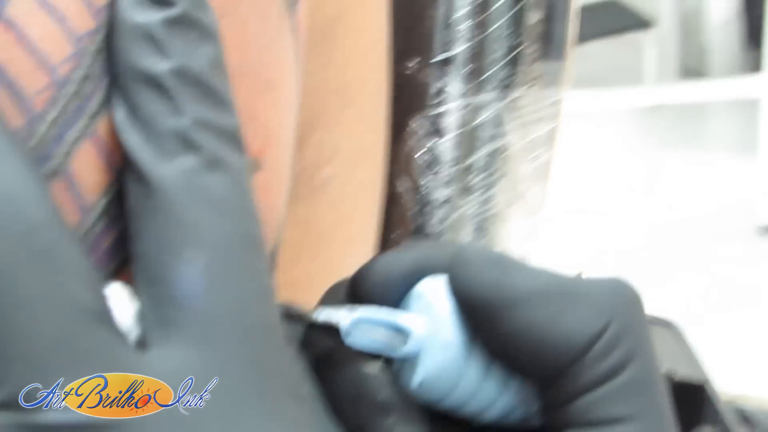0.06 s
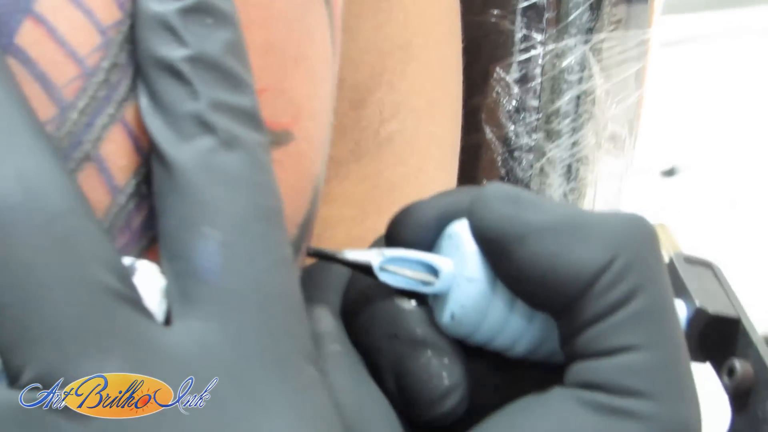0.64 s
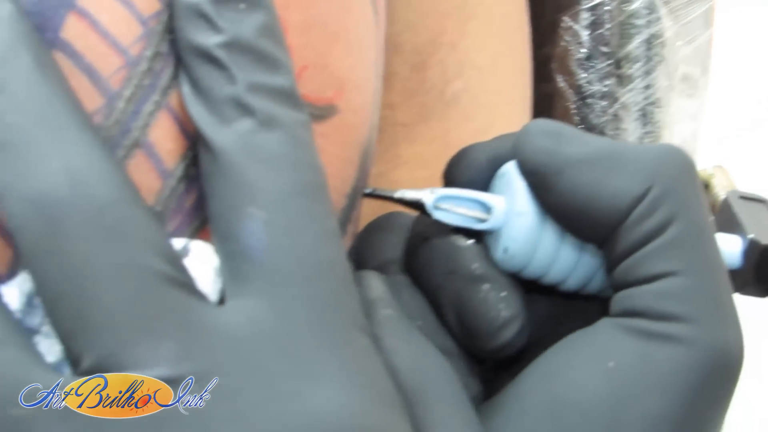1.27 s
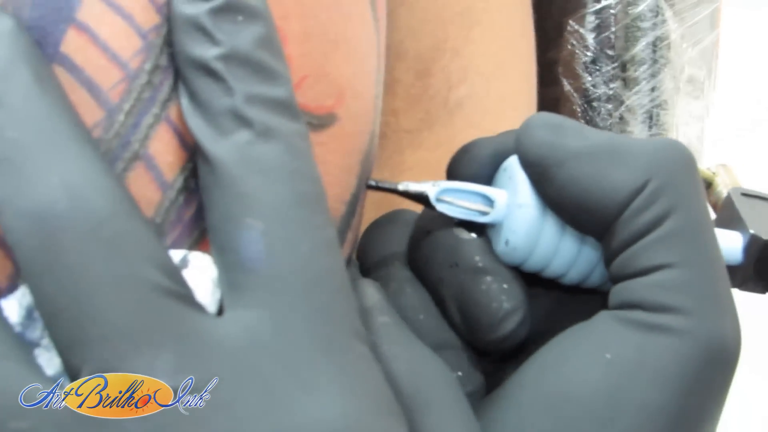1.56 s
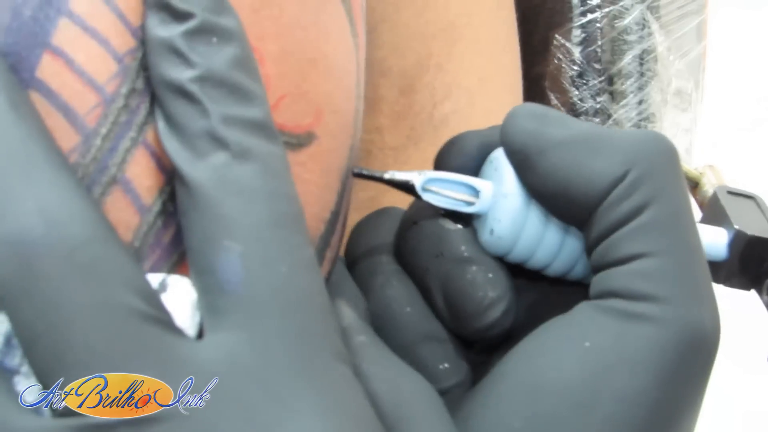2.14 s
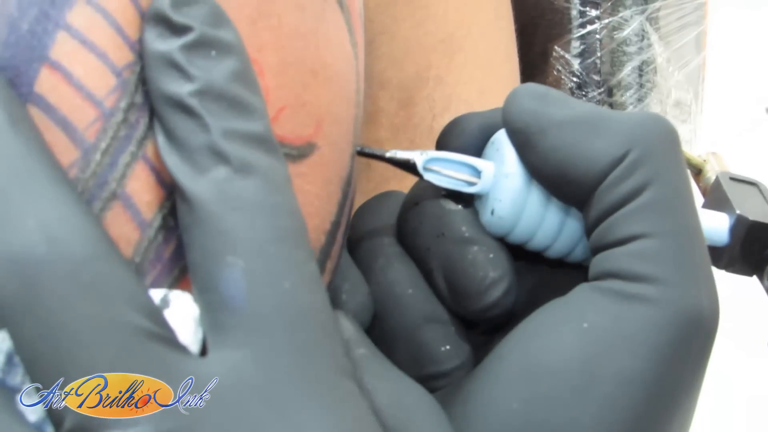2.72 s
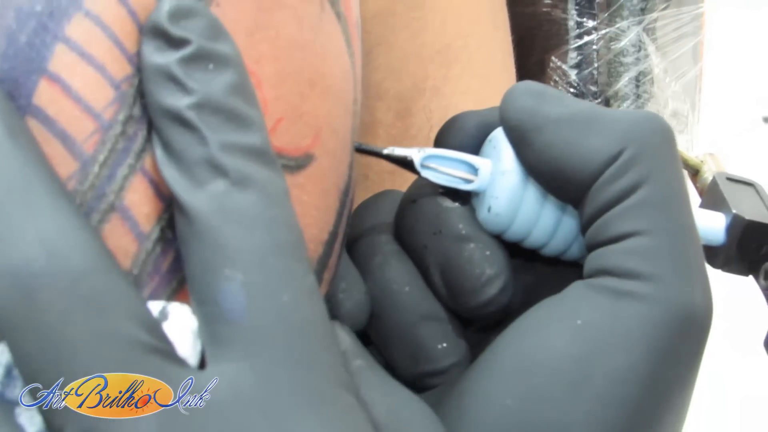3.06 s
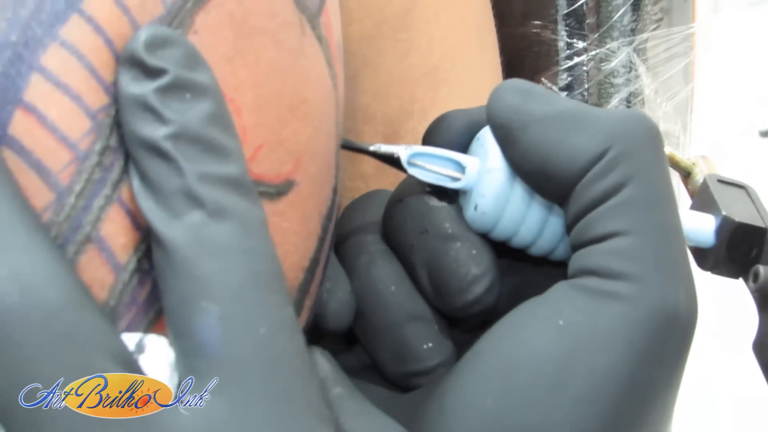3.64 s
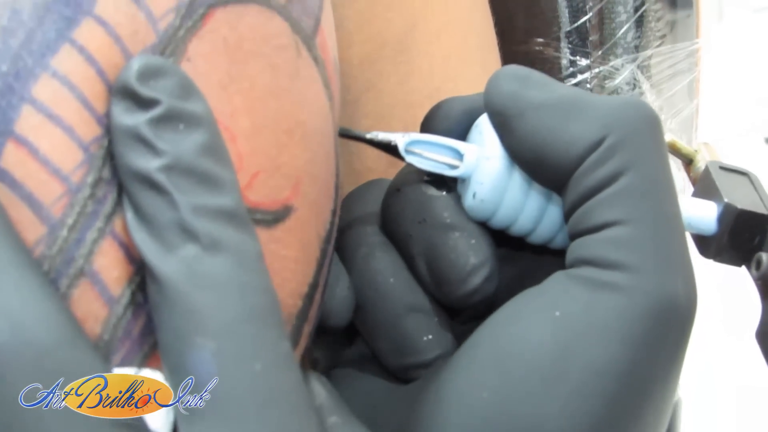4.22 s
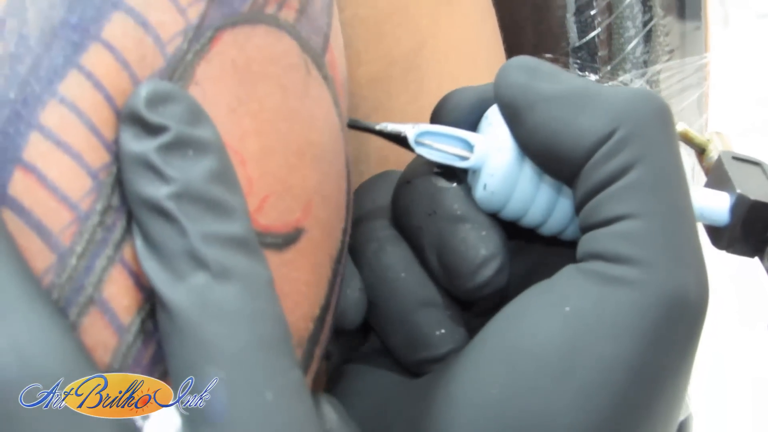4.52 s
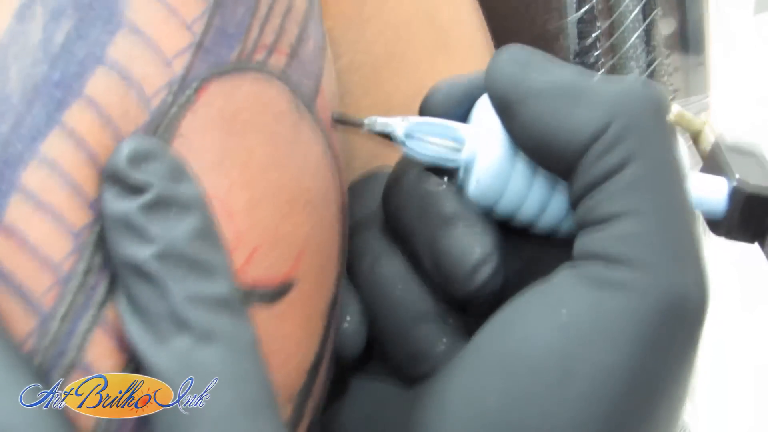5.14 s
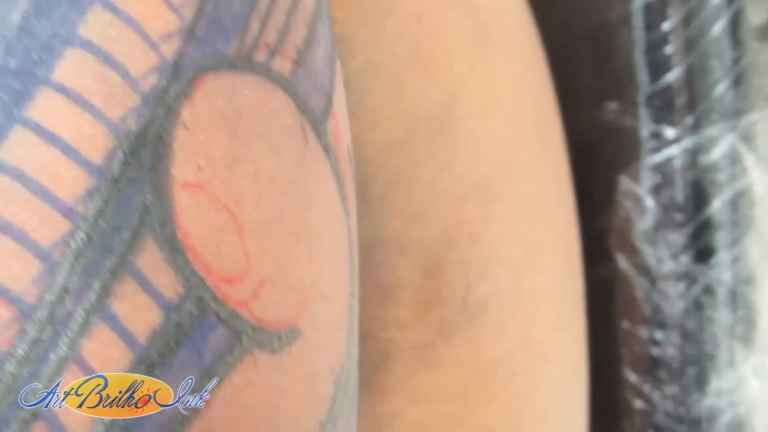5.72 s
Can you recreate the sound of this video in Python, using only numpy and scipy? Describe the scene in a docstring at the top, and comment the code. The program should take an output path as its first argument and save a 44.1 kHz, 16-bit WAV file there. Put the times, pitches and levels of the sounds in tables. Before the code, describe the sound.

An electric tattoo machine buzzes right by the microphone in a small, hard-walled studio. The buzz is wiry and nearly constant in pitch, with a high metallic sizzle and ring, and now and then it tightens for an instant. After about five seconds it switches off abruptly. Soft ventilation hums underneath throughout, and a faint, dry handling tick comes just before the end.

```python
"""A coil tattoo machine buzzes close to a stereo microphone in a small, hard-walled studio.
Its armature slams onto the coils about 119 times a second and springs back against the contact screw;
each blow rattles the needle bar and rings the steel. Now and then the bar seats into a clean cycle and
the buzz tightens. Ventilation hums underneath. The machine is switched off, and a faint handling tick
follows."""
import sys
import numpy as np
from scipy import signal
from scipy.fft import rfft, irfft, next_fast_len
from scipy.io import wavfile
from scipy.ndimage import uniform_filter1d, map_coordinates

SR = 44100
rng = np.random.default_rng(int(sys.argv[2]) if len(sys.argv) > 2 else 0)


def dump(signal):
    """Clip the signal to [-1, 1] and save it as 16-bit WAV at the path in sys.argv[1]."""
    limited = np.clip(np.atleast_2d(signal).T, -1, 1)
    pcm = np.round(limited * 32767).astype(np.int16)
    wavfile.write(sys.argv[1], SR, pcm)


N = 259308
TIME = np.arange(N) / SR
OFF_S = 5.315
RETURN_PHASE = .43  # share of a cycle from the blow on the coils to the return on the screw
LEAD_SAMPLES = 128  # padding ahead of a blow's response

# Armature stroke rate, drifting with the load: time_s, rate_hz
STROKE_RATE = [(0, 118.6), (.2, 118.4), (.47, 118.7), (.6, 118.15), (.8, 118.6), (1.62, 118.5),
               (1.72, 117.6), (1.81, 118.85), (2, 118.9), (2.12, 118.5), (2.33, 118.7), (2.5, 118.1),
               (2.6, 118.9), (2.76, 118.3), (3, 118.65), (3.7, 118.65), (3.95, 119.1), (4.25, 118.6),
               (4.55, 119.2), (5, 119.35), (5.1, 118.9), (5.3, 119.5)]
# Relative levels as the hand moves along the skin: time_s, rattle_db, tube_db, sizzle_db, ring_db
WORK_LEVELS = [(0, -36, -43.5, -32, -34), (0.7, -35, -43.5, -32, -37), (1.4, -36, -43.5, -32, -33.5),
               (2.1, -36.5, -45, -34, -30), (2.65, -36.5, -44.5, -33, -29), (3.15, -38, -48.5, -35, -27.8),
               (3.7, -38.5, -47, -35.5, -29), (4.25, -40, -47, -37, -29.5), (4.7, -39, -46, -36, -26),
               (5.17, -38.5, -44.5, -35, -28.5), (5.3, -39, -46, -36.5, -36)]
# Return on the contact screw, dipping early and then growing: time_s, level_db
RETURN_LEVEL = [(0, -7.5), (1.3, -18), (2.3, -13), (3, -10.5), (4.3, -7.5), (5.3, 2.5)]
# The bar seats; the shift moves energy from frame and contacts to the bar's sizzle:
# middle_s, length_s, tightening_db, shift_db, speedup_hz, whistle_db, rasp_db
BAR_SEATS = [(0.119, 0.12, -3, 1.1, 0.86, 4, 2), (0.334, 0.079, 1, 0.7, 0.71, 8, 1.5),
             (0.666, 0.087, 6, 0, 0.61, 4, -1.5), (0.93, 0.062, 4, 0, 0.93, 3, -1),
             (1.198, 0.083, 5, 0.3, 0.59, 8, 0.5), (1.414, 0.12, 18.5, 0.4, 0.97, 7, 0.5),
             (2.397, 0.08, 17, 1.3, 1.55, 11, 2), (2.855, 0.059, 6.5, 0.8, 1.06, 8, 2.5),
             (3.127, 0.11, 7, 0.5, 0.021, 3, -1), (3.408, 0.11, 14, 0.3, 0.2, -1, 0),
             (3.857, 0.066, 18, 0, 0.33, 8, -3.5), (4.073, 0.1355, 11.5, 2, 1.2, 7, 1.5),
             (4.408, 0.091, 2, 1.5, 0.69, 4, 0), (4.6, 0.051, 7, 1, 0.08, -1, 0),
             (4.705, 0.048, 7.5, 1, 1, 10, 1.5), (4.83, 0.046, 10, 0.3, 0, 5, 0),
             (4.916, 0.076, 7, 1, 1.04, 3, 0.5)]
# Colour of the blows in frame and tube: frequency_hz, gain_db
TUBE_COLOUR = [(300, -16), (600, -13), (1150, -6.5), (1700, -8), (2100, 3.5), (2500, -2.5), (3400, 4),
               (4000, 5.5), (4800, -9.5), (6000, -24.5)]
# Colour of the contacts' clatter: frequency_hz, gain_db
CLATTER_COLOUR = [(3000, -50), (4200, -10), (5200, -2.5), (6500, 0), (7500, 0), (8100, 1.5), (9500, -25.5)]
# Colour of the needle bar's sizzle: frequency_hz, gain_db
SIZZLE_COLOUR = [(7000, -27.5), (8000, -3.5), (8700, 0.5), (9700, 3), (10400, 1.5), (11000, 5), (11500, 3),
                 (12400, 0.5), (13300, -2.5), (14300, -7), (15500, -26.5)]
# Ring of the armature, drifting with the load: time_s, pitch_hz
RING_PITCH = [(0, 10950), (1, 10950), (1.9, 11280), (3.3, 11490), (4.2, 11260), (4.8, 11130), (5.3, 11240)]
# Width of that ring, greater when it is damped more: time_s, width_hz
RING_WIDTH = [(0, 800), (2, 760), (3.5, 740), (4.2, 820), (4.7, 1050), (5.3, 950)]
# Whistle of the needle bar, drifting with the grip: time_s, pitch_hz
WHISTLE_PITCH = [(0, 10070), (.8, 9700), (1.3, 9670), (2.4, 9820), (3.3, 9900), (4.1, 9870), (4.7, 10250),
                 (5.3, 10270)]
# Wiry partials of frame and tube: stroke_rate_multiple, level_db
FLEX_PARTIALS = [(5, -4), (8, -30), (9, -1), (10, 2), (11, -1), (12, -14), (13, -4.5), (14, -9.5),
                 (15, -11), (16, -7.5), (17, 2), (18, -27), (19, 4), (20, -10), (21, -9.5), (22, -4),
                 (23, -5.5), (24, -18), (25, -9.5), (26, -7.5), (27, -8), (28, -8.5), (29, -5), (30, -15),
                 (31, -14), (32, -1)]
# Narrow rising bands where single buzz partials briefly dip or swell, including a 3.8 kHz ring:
# time_s, centre_hz, rise_hz_per_s, width_hz, gain_db
PARTIAL_SWELLS = [(3.202, 1110, 190, 67, 0), (3.302, 3810, 116, 65, 10), (4.6, 1900, 110, 140, -4),
                  (5, 3320, 100, 348, 0.5), (2.3, 1067, 60, 45, -3), (1, 2016, 110, 80, -2.5)]
# Decay of the studio: frequency_hz, t60_s
STUDIO_DECAY = [(200, 0.98), (2000, 0.46), (6000, 0.47), (10000, 0.38), (15000, 0.25)]
# Stereo width of the blows at the microphone: frequency_hz, side_gain_db
STEREO_WIDTH = [(300, -2.5), (2500, -13.5), (4500, -12.5), (6000, -4.5), (9000, -3.5), (13000, -2)]
# Colour of the ventilation's rush: frequency_hz, gain_db
AIR_COLOUR = [(18, -32), (30, -17), (55, -20), (90, -5), (125, -11), (190, -3), (280, -8), (360, -5),
              (450, -12), (750, -10), (1400, -11.5), (3900, -25), (11500, -35), (15000, -44)]
# Left-right likeness of that rush: frequency_hz, correlation
AIR_LIKENESS = [(100, 0.9), (300, 0.85), (1500, 0.5), (8000, 0.36)]
# Strength of the draught: time_s, level_db
AIR_LEVEL = [(0, -46.1), (1.3, -45), (2.1, -47.4), (2.7, -47.1), (4.1, -49.9), (5.4, -48.9), (5.88, -47.3)]
# Swelling hum of the fan motor: time_s, level_db
MOTOR_LEVEL = [(0, -58.5), (.6, -61), (1.2, -55.5), (1.55, -55), (1.8, -63), (2.7, -60.5), (4.5, -65.5),
               (5.3, -65)]
# Other ventilation tones: pitch_hz, level_db
FAN_TONES = [(31, -66.5), (43.2, -64), (147, -62.5), (172.3, -66), (360.5, -59.5), (690, -65)]
# Handling tick: peak_s, level_db
HANDLING_TICKS = [(5.677, -38)]
# Narrow gaps in the microphone's response: centre_hz, width_hz, remaining_gain
MIC_NOTCHES = [(3950, 226, 0.16), (7940, 180, 0.18)]


def amp(db):
    """Decibels to gain."""
    return 10 ** (np.asarray(db) / 20)


def unit(x):
    """Scaled to rms 1."""
    return x / np.sqrt(np.mean(x ** 2) + 1e-20)


def along(points, hz):
    """(Hz, value) points interpolated on a log axis."""
    frequencies, values = np.transpose(points)
    return np.interp(np.log(hz + 1), np.log(frequencies + 1), values)


def curves(rows):
    """One value per sample for each column after the time."""
    times, *columns = np.transpose(rows)
    return [np.interp(TIME, times, column) for column in columns]


def wobble(rate):
    """A smooth random curve, rate knots a second."""
    return map_coordinates(rng.standard_normal(int(N * rate / SR) + 4), [TIME * rate])


def filtered(x, response):
    """x through a complex response of frequency."""
    size = 2 * next_fast_len(N // 2 + SR // 4)
    return irfft(rfft(x, size) * response(np.fft.rfftfreq(size, 1 / SR)), size)[..., :N]


def minimum_phase(points, hz):
    """Causal response with the gain of (Hz, dB) points."""
    cepstrum = irfft(np.log(amp(along(points, hz))))
    half = len(cepstrum) // 2
    return np.exp(rfft(np.r_[cepstrum[0], 2 * cepstrum[1:half], np.zeros(half)]))


def pulses(times, sizes):
    """Impulses placed between samples by a windowed sinc."""
    at = times[:, None] * SR
    index = np.floor(at).astype(int) + np.arange(-7, 9)
    shape = np.sinc(index - at) * np.cos(np.pi * (index - at) / 16) ** 2
    return np.bincount(np.clip(index, 0, N).ravel(), (sizes[:, None] * shape).ravel(), N + 1)[:N]


def seating(rate_hz):
    """The loose needle bar seats quickly, holds a clean cycle for a moment and lets go."""
    holds = np.array([np.exp(-(2 * (TIME - middle) / length) ** 4) for middle, length, *_ in BAR_SEATS])
    tight_db, shift_db, speedup_hz, whistle_db, rasp_db = np.transpose(BAR_SEATS)[2:] @ holds
    loose = amp(-3.2 + 1.8 * wobble(20) - tight_db)
    # a load that slows the armature shifts energy back to frame and contacts
    load_db = .6 * (rate_hz - uniform_filter1d(rate_hz, size=SR))
    grip_db = .12 * wobble(14)
    return loose, shift_db + load_db + grip_db, speedup_hz, whistle_db, rasp_db


def armature_strokes(turns, loose, jitter_s=1e-5, scatter_db=3):
    """A firm blow on the coils, a more erratic return on the screw; looseness scatters both."""
    cycle = np.arange(int(np.interp(OFF_S, TIME, turns)))
    chance = rng.standard_normal((1000, 4))[:len(cycle)] * np.interp(cycle, turns, loose)[:, None]
    blow_s = np.interp(cycle, turns, TIME) + jitter_s * chance[:, 0]
    return_s = np.interp(cycle + RETURN_PHASE, turns, TIME) + 2 * jitter_s * chance[:, 1]
    blows = pulses(blow_s, amp(.5 * scatter_db * chance[:, 2]))
    returns = pulses(return_s, amp(scatter_db * chance[:, 3]))
    return unit(blows), unit(returns)


def rattle(turns, loose, running, tube_db, clatter_db, sizzle_db):
    """Strokes shake tube, contacts and needle bar; the bar chatters most just after each contact."""
    blows, returns = armature_strokes(turns, loose)
    after = lambda phase: np.exp(-((turns - phase) % 1) / .18)
    chatter = unit(rng.standard_normal(N) * running * (after(0) + 1.2 * after(RETURN_PHASE)))

    def part(colour, return_db, chatter_db):
        """Blow, return and chatter blended at even power, then coloured by one part."""
        back = amp(curves(RETURN_LEVEL)[0] + return_db)
        shake = loose * amp(chatter_db)
        drive = (blows + back * returns + shake * chatter) / np.sqrt(1 + back ** 2 + shake ** 2)
        return unit(filtered(drive, lambda hz: minimum_phase(colour, hz)))

    return (amp(tube_db) * part(TUBE_COLOUR, return_db=3, chatter_db=7.5)
            + amp(clatter_db) * part(CLATTER_COLOUR, return_db=-1, chatter_db=3.5)
            + amp(sizzle_db) * part(SIZZLE_COLOUR, return_db=11, chatter_db=-4))


def struck_mode(turns, stroke_hz, pitch_hz, width_hz, scatter_db, slip_rad, detune_hz=35):
    """A mode struck once a cycle swells and dies away, slightly different with each blow."""
    size, detune, lag = rng.standard_normal((1000, 3))[np.floor(turns).astype(int)].T
    age_s = turns % 1 / stroke_hz
    decay = np.pi * width_hz * age_s
    phase = 2 * np.pi * (pitch_hz + detune_hz * detune) * age_s + slip_rad * lag
    return unit(amp(scatter_db * size) * decay * np.exp(-decay) * np.sin(phase))


def steel_ring(turns, stroke_hz, loose):
    """The armature rings on the blow and weakly on the return."""
    pitch_hz, width_hz = curves(RING_PITCH)[0], curves(RING_WIDTH)[0]
    blow, back = (struck_mode(at, stroke_hz, pitch_hz, width_hz, scatter_db=1.2, slip_rad=1.1 * loose)
                  for at in (turns, turns - RETURN_PHASE))
    return unit(blow + amp(curves(RETURN_LEVEL)[0] - 14) * back)


def bar_whistle(turns, stroke_hz, loose):
    """The needle bar whistles equally on blow and return."""
    pitch_hz = curves(WHISTLE_PITCH)[0]
    return unit(sum(struck_mode(at, stroke_hz, pitch_hz, width_hz=220, scatter_db=2, slip_rad=1.2 * loose)
                    for at in (turns, turns - RETURN_PHASE)))


def rebounds(body, t60_s=.0061, scatter_db=.5):
    """Dense little rebounds follow each blow and leave its broad colour even; mid and side."""
    t = np.arange(SR // 50) / SR
    tail = rng.standard_normal((2, len(t))) * amp(-60 * t / t60_s)
    tail /= np.linalg.norm(tail, axis=1, keepdims=True)
    tail[0] = amp(scatter_db) * tail[0] + (t == 0)  # the blow itself, in the mid only
    spectrum = rfft(np.pad(tail, ((0, 0), (LEAD_SAMPLES, 0))))
    tail = irfft(spectrum / np.sqrt(uniform_filter1d(abs(spectrum) ** 2, size=12, axis=1)))
    tail /= np.linalg.norm(tail, axis=1, keepdims=True)
    return signal.fftconvolve(body[None], tail, axes=1)[:, LEAD_SAMPLES:LEAD_SAMPLES + N]


def wall_response():
    """The walls' answer as mid and side; each frequency dies at its own speed."""
    hz, t, spectrum = signal.stft(rng.standard_normal((2, SR // 2)), SR, nperseg=256)
    decay = amp(-60 * t / along(STUDIO_DECAY, hz)[:, None])
    tail = signal.istft(spectrum * decay, SR, nperseg=256)[1]
    return tail / np.linalg.norm(tail, axis=1, keepdims=True)


def studio_reverb(x, positions=13):
    """The path to the microphone glides between wall responses as the hand moves."""
    lead = SR // 4  # the room is already sounding at the start
    x = np.r_[x[:lead], x]
    place = np.r_[np.zeros(lead), np.linspace(0, positions - 1, N)]
    room = np.zeros((2, lead + N + SR))
    for k in range(positions):
        near = np.flatnonzero(abs(place - k) < 1)
        faded = x[near] * np.cos(np.pi / 2 * (place[near] - k))
        echo = signal.fftconvolve(faded[None], wall_response(), axes=1)
        room[:, near[0]:near[0] + echo.shape[1]] += echo
    return room[:, lead:lead + N]


def swell_db(hz):
    """A buzz partial briefly dips or swells as a narrow rising band passes over it."""
    return sum(db * np.exp(-np.square((hz - centre - rise * (TIME - at_s)) / width))
               for at_s, centre, rise, width, db in PARTIAL_SWELLS if abs(hz - centre) < 1000)


def wiry_buzz(turns, frame_db, tube_db):
    """Frame (low partials) and tube (high) flex with the blows, swaying and lagging with the grip."""
    buzz = np.zeros(N)
    for k, db in FLEX_PARTIALS:
        tube_share = np.clip((k - 19) / 3, 0, 1)
        level_db = db + frame_db + tube_share * (tube_db - frame_db)
        sway_db = wobble(3.34) + 1.5 * wobble(21.96)
        lag = .4 * wobble(1.95) + .12 * np.sqrt(k) * wobble(25)
        gain = amp(level_db + sway_db + swell_db(k * STROKE_RATE[0][1]))
        buzz += gain * np.cos(2 * np.pi * k * turns + lag)
    return buzz


def tattoo_machine():
    """Close up and near centre, the armature drives rattle, ring and buzz; the studio answers."""
    running = np.clip((OFF_S - TIME) / .0037, 0, 1)
    rate_hz = curves(STROKE_RATE)[0]
    loose, shift_db, speedup_hz, whistle_db, rasp_db = seating(rate_hz)
    stroke_hz = rate_hz + speedup_hz + .08 * wobble(15)
    turns = np.cumsum(stroke_hz + .22 * loose * wobble(24)) / SR

    rattle_db, tube_db, sizzle_db, ring_db = curves(WORK_LEVELS)
    # a shift quietens frame and contacts and feeds the needle bar
    frame_db = rattle_db - 2 * shift_db
    clatter_db = rattle_db - 1.56 * shift_db
    sizzle_db += .98 * shift_db
    tube_db += rasp_db
    ring_db += .6 * wobble(11)

    body = rattle(turns, loose, running, tube_db - 1, clatter_db, sizzle_db + 2.5)
    steel = amp(ring_db + 1) * steel_ring(turns, stroke_hz, loose)
    whistle = amp(sizzle_db + whistle_db - 9) * bar_whistle(turns, stroke_hz, loose)
    ring = running * (steel + whistle)
    in_room = amp(-1.5) * rebounds(body) + studio_reverb(body + amp(-18) * ring)
    mid, side = filtered(in_room, lambda hz: np.array([np.ones_like(hz), amp(along(STEREO_WIDTH, hz))]))
    mid += running * wiry_buzz(turns, frame_db - 17.5, tube_db - 6.5)
    # the ring reaches the left capsule 23 microseconds before the right
    ring_pair = filtered(ring, lambda hz: np.exp(1j * np.pi * hz * 23e-6 * np.array([[1], [-1]])))
    return (np.array([mid + side, mid - side]) + ring_pair) * amp([[.25], [-.25]])


def fan_tone(hz, db):
    """An unsteady fan or motor tone; the higher ones waver most."""
    gain = np.sqrt(2) * amp(db + 2.6 * wobble(6))
    return gain * np.sin(2 * np.pi * hz * TIME + min(hz / 180, 1.5) * wobble(18))


def ventilation(motor_hz=94.8):
    """A soft rush of air with fan and motor hum, in the background and a little to the left."""
    def air_response(hz):
        angle = np.arccos(np.clip(along(AIR_LIKENESS, hz), -1, 1)) / 2
        return amp(along(AIR_COLOUR, hz)) * [np.cos(angle), np.sin(angle)]

    mid, side = filtered(rng.standard_normal((2, N)), air_response)
    draught_db = curves(AIR_LEVEL)[0]
    rush = amp(draught_db + 1.35 * wobble(8.8)) * unit(np.array([mid + side, mid - side]))
    hum = fan_tone(motor_hz, curves(MOTOR_LEVEL)[0])
    hum += sum(fan_tone(hz, db + draught_db - draught_db.mean()) for hz, db in FAN_TONES)
    return rush * amp([[1.5], [-1.5]]) + hum * amp([[2.3], [-2.3]])


def handling_tick(centre_hz=4500, width_hz=3000, t60_s=.014):
    """A faint dry tick as the hand moves away."""
    burst = sum(amp(db - 60 * abs(TIME - peak_s) / t60_s) for peak_s, db in HANDLING_TICKS)
    band = lambda hz: 1j * hz * width_hz / (centre_hz ** 2 - hz ** 2 + 1j * hz * width_hz)
    return burst * filtered(rng.standard_normal((2, N)), band)


def scene():
    """The machine up close, ventilation behind it, a tick after the switch-off."""
    return tattoo_machine() + ventilation() + handling_tick()


def record(dry):
    """The microphone has two narrow notches and passes nothing above 15.2 kHz."""
    def response(hz):
        gain = hz < 15200
        for centre, width, remaining in MIC_NOTCHES:
            offset, damping = centre ** 2 - hz ** 2, 1j * hz * width
            gain = gain * (offset + remaining * damping) / (offset + damping)
        return gain

    return filtered(dry, response)


dry = scene()
out = record(dry)
dump(out)
```